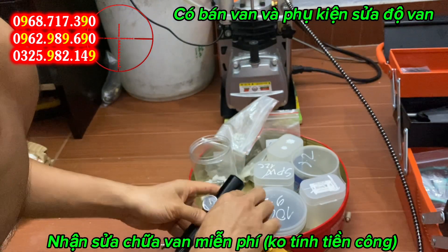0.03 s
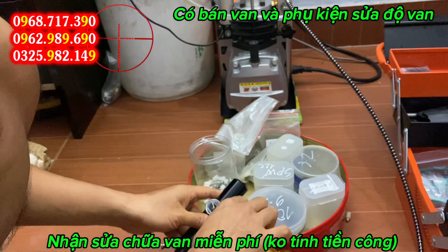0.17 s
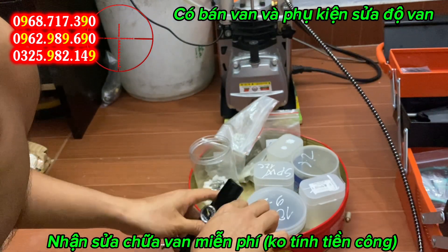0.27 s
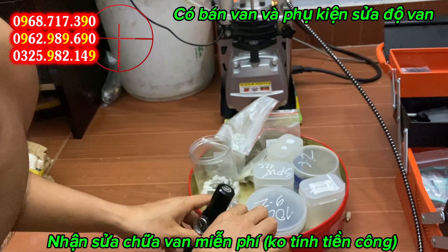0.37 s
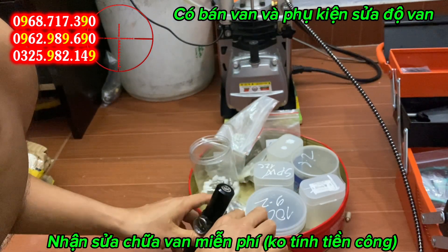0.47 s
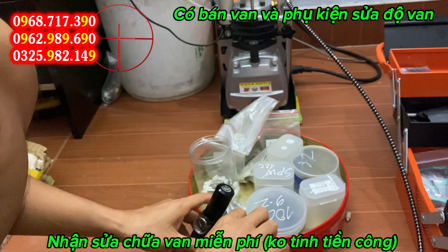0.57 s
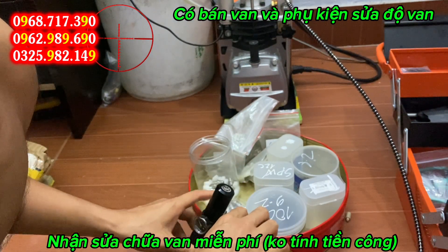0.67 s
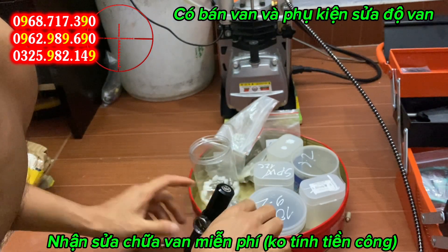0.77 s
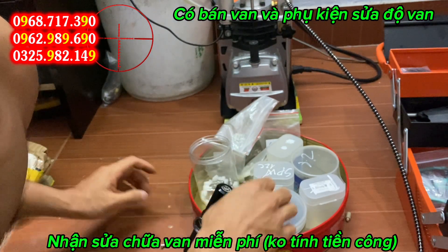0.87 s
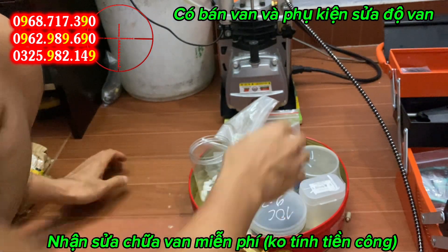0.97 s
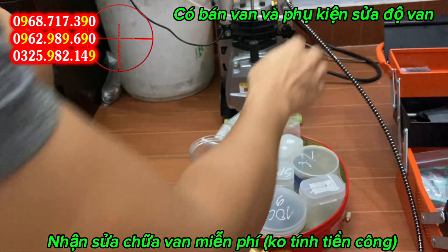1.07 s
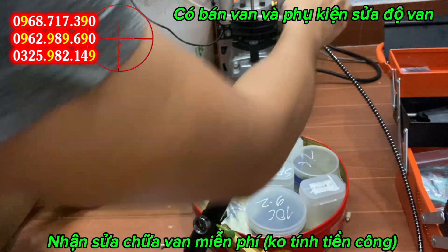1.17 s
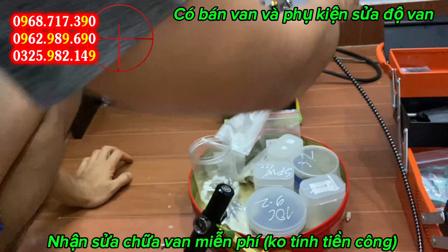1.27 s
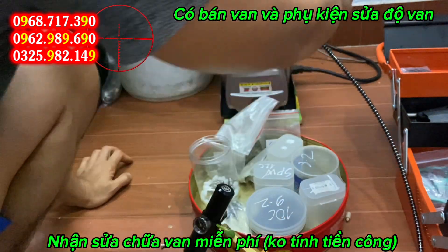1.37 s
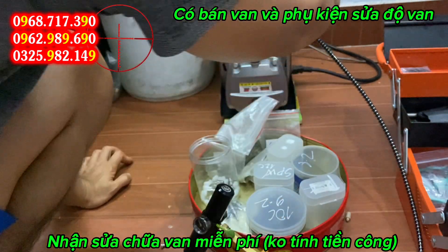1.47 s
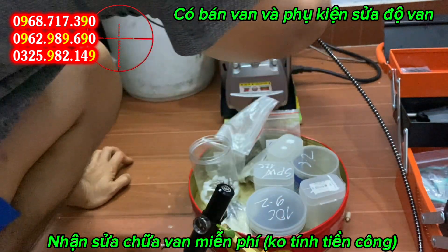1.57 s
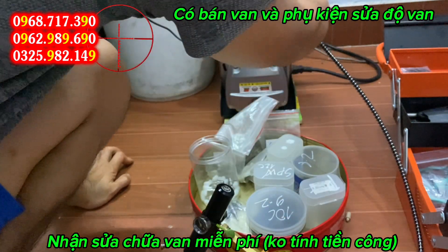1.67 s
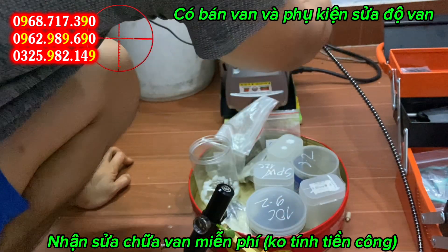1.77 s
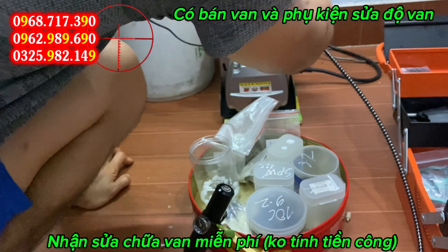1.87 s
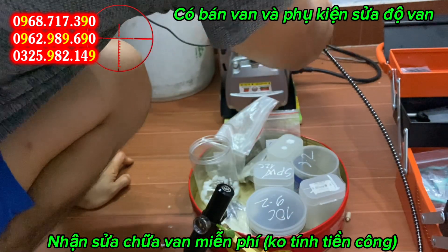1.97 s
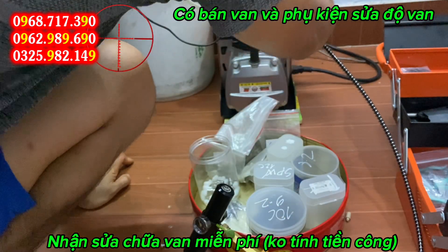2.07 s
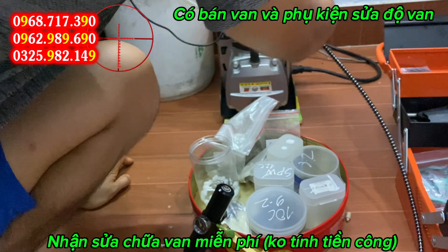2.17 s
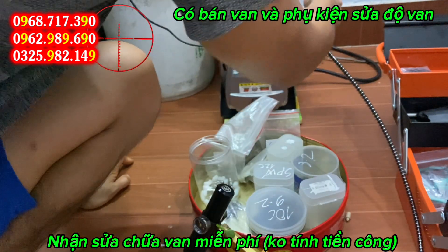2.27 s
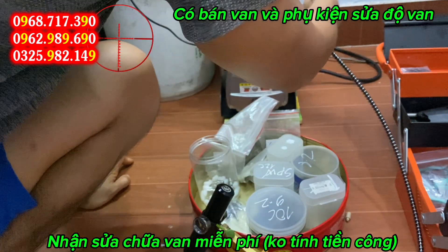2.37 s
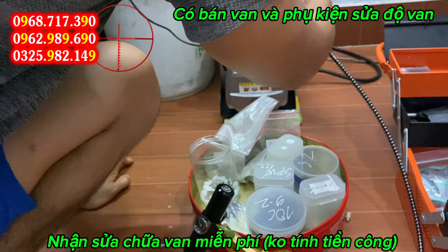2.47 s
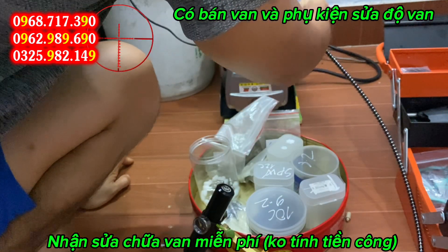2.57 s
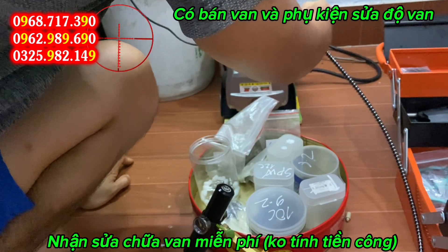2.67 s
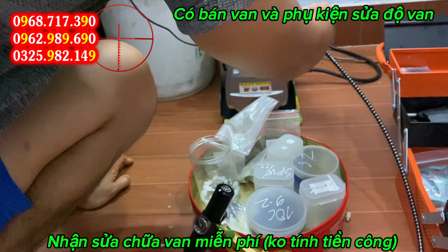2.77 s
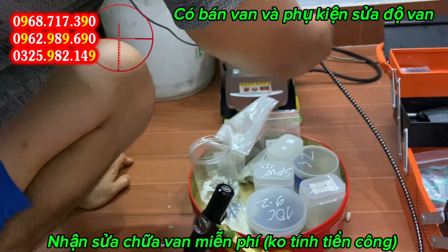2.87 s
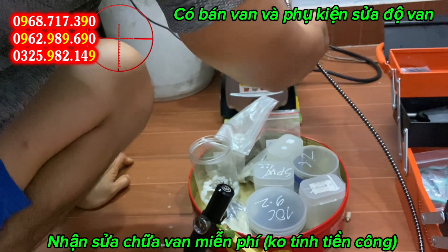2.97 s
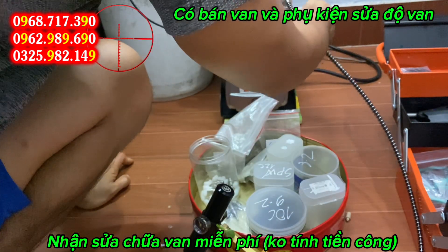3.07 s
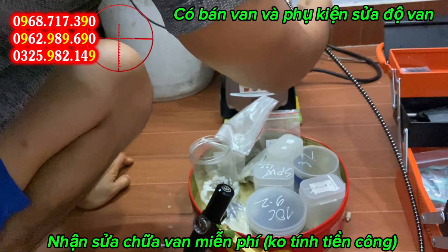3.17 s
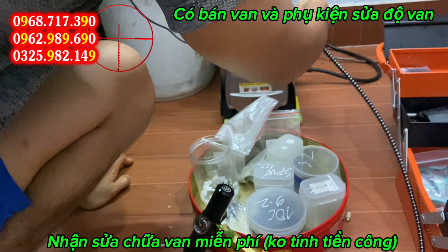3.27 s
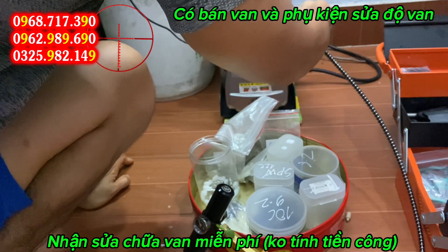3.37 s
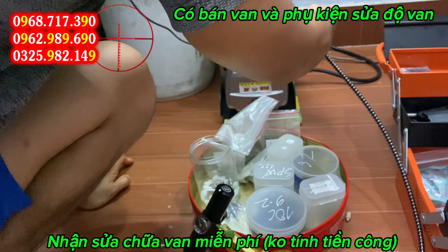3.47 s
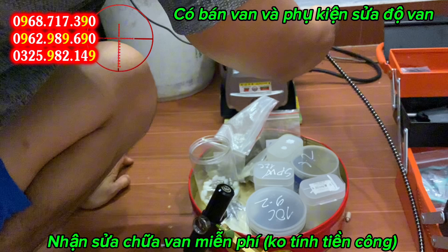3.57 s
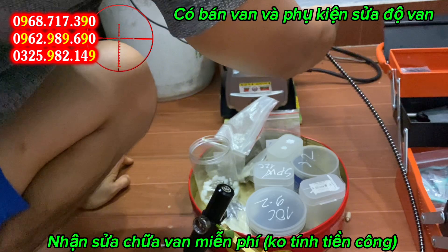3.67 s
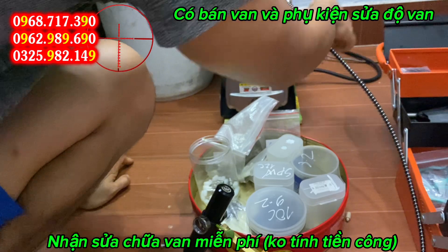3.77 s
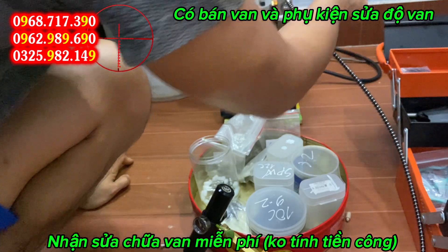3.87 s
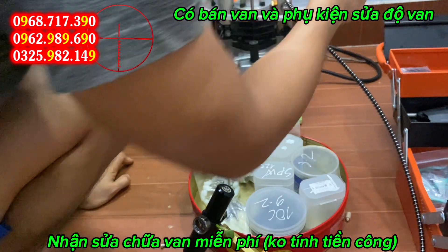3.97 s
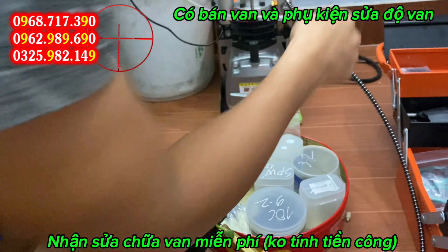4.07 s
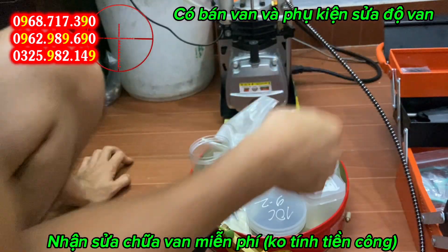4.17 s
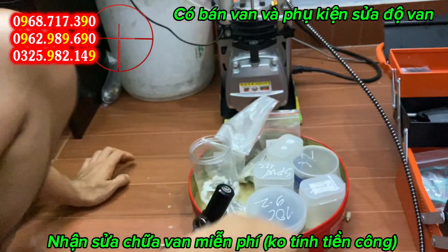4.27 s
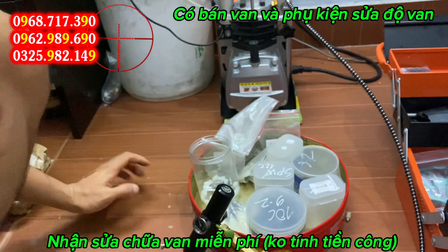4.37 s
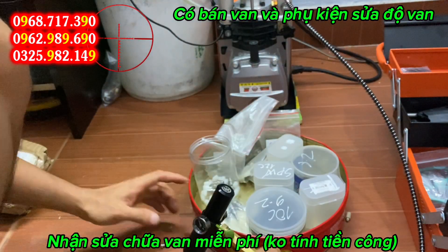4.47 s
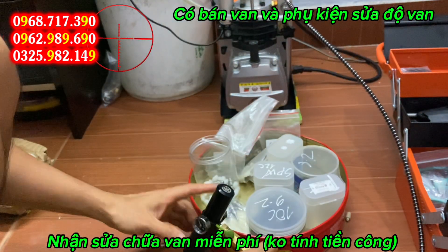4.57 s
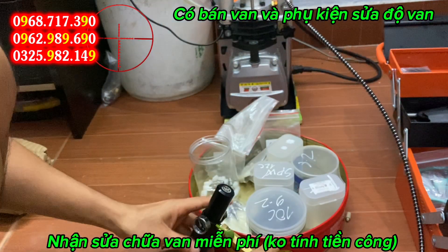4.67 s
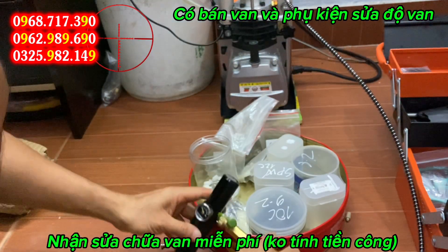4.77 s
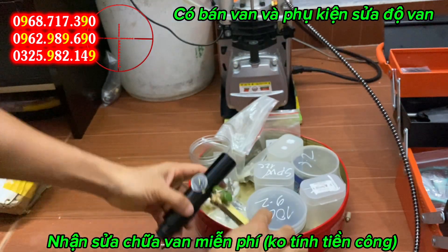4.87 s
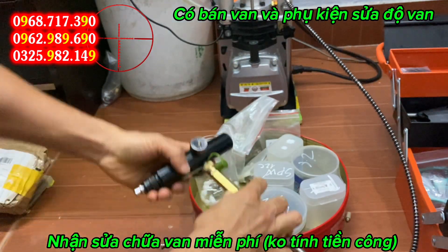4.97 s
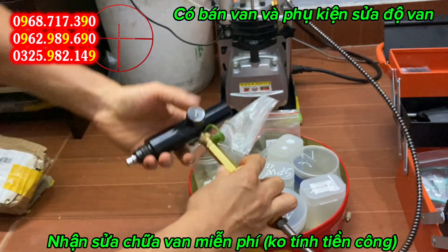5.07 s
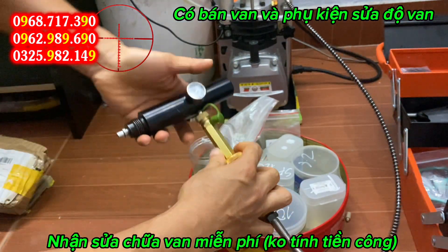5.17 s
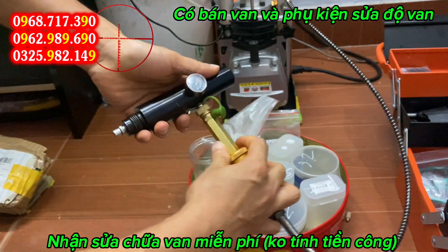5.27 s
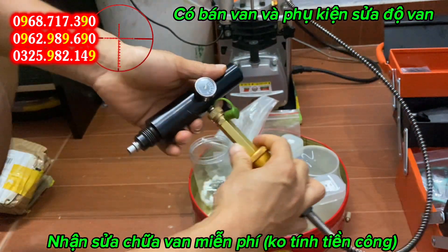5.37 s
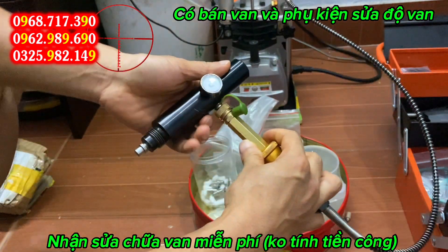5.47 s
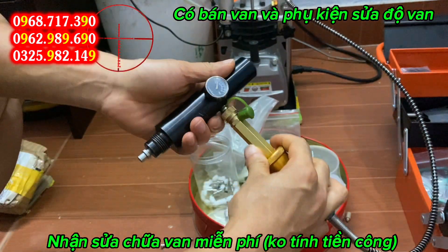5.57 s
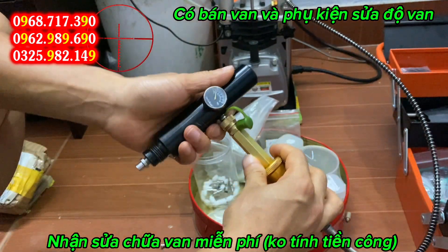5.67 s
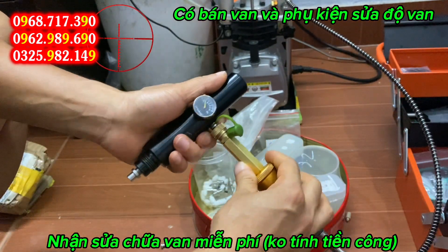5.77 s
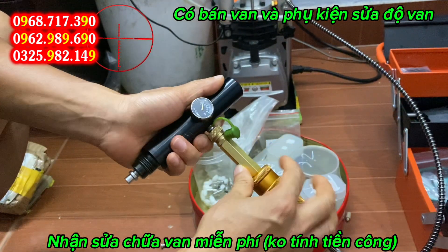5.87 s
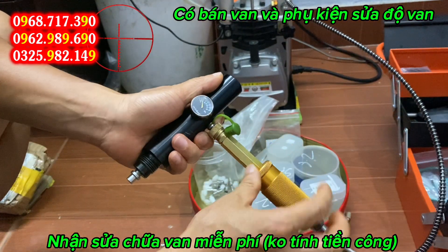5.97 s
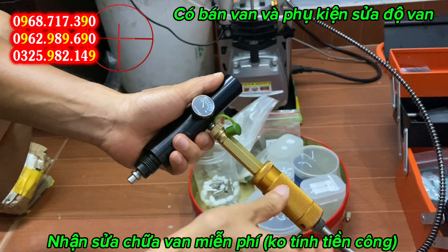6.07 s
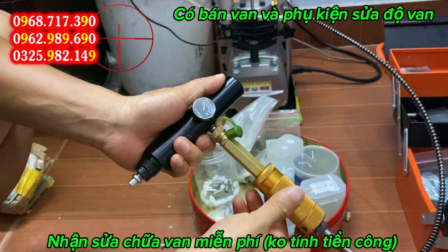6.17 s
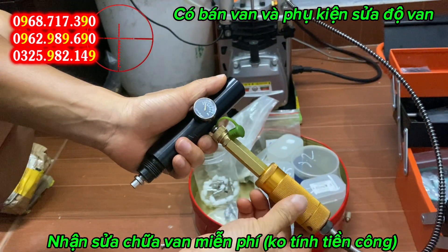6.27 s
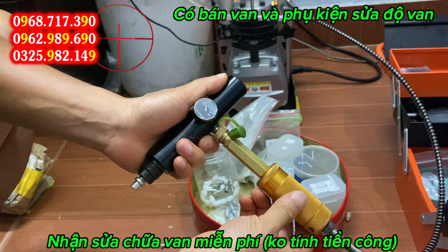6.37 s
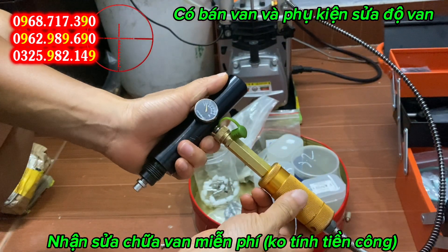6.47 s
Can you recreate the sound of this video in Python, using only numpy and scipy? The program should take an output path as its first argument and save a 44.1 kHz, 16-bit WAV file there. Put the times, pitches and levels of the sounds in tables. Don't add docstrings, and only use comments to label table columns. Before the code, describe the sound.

After light plastic and brass knocks and near silence, a small piston compressor jolts on, hisses briefly, and drones loudly in a tiled room.

```python
import sys
import numpy as np
from scipy import signal
from scipy.fft import rfft, irfft, next_fast_len
from scipy.io import wavfile
from scipy.ndimage import uniform_filter1d, map_coordinates

SR = 44100
rng = np.random.default_rng(int(sys.argv[2]) if len(sys.argv) > 2 else 0)


def makeup_ratio(level_db):
    decades = np.asarray(level_db, float) / 20
    return 10 ** decades


def digitize_waveform(pressure):
    field = np.atleast_2d(pressure).T
    bounded = np.clip(field, -1, 1)
    quanta = np.round(bounded * 32767).astype(np.int16)
    wavfile.write(sys.argv[1], SR, quanta)


N = 287532
CLOCK = np.arange(N) / SR
SWITCH_S, SHUT_S = 1.966, 2.7
FULL_SPEED_RPS = 47.4

# (time [s], level [dB])
HUM_LEVEL = [
    (2.04, -28),
    (2.14, -7.5),
    (2.23, -2),
    (2.29, 0.5),
    (2.68, 0),
    (2.87, -3),
    (3.15, 0),
    (6.52, 0),
]
# (time [s], speed [turns/s])
SHAFT_SPEED = [(1.966, 0), (2.04, 22), (2.08, 31), (2.11, 35), (2.14, 43.5), (2.17, 46.3), (2.2, 47.4),
               (2.3, 47.7), (2.6, 47.86), (2.85, 47.86), (3.1, 47.7), (3.6, 47.55), (4.3, 47.44),
               (5.3, 47.4), (6.52, 47.33)]


def unit(x):
    return x / np.sqrt(np.mean(x ** 2) + 1e-20)


def along(points, hz):
    f, v = np.transpose(points)
    return np.interp(np.log(hz + 1), np.log(f + 1), v)


def curves(rows):
    s, *cols = np.transpose(rows)
    return [np.interp(CLOCK, s, c) for c in cols]


def wobble(rate_hz):
    s = CLOCK[::128]
    knots = rng.standard_normal(200)
    return np.interp(CLOCK, s, map_coordinates(knots, [s * min(rate_hz, 25)]))


def filtered(x, response):
    m = next_fast_len(x.shape[-1] + 8192)
    spectrum = rfft(x, m) * response(np.fft.rfftfreq(m, 1 / SR))
    return irfft(spectrum, m)[..., :x.shape[-1]]


def modes(table):
    def response(f):
        total = 0
        for k, (centre, width, db) in enumerate(table):
            damped = 1j * f * width
            total = total + (-1) ** k * makeup_ratio(db) * damped / (centre * centre - f * f + damped)
        return total
    return response


def sides(db):
    return makeup_ratio(np.array([db / 2, -db / 2]))


def rush(spectrum, gate, likeness_scale=1):
    # (frequency [Hz], left-right likeness [0-1])
    likeness = [(60, 0.34), (250, 0.66), (520, 0.4), (860, 0), (1200, 0.64), (1700, 0.17), (2600, 0.48),
                (4300, 0.56), (5500, 0.16), (7000, 0.24)]

    def shape(hz):
        turn = np.arccos(np.clip(likeness_scale * along(likeness, hz), 0, 1)) / 2
        return makeup_ratio(along(spectrum, hz)) * [np.cos(turn), np.sin(turn)]

    mid, side = filtered(gate * rng.standard_normal((2, N)), shape)
    return unit(np.array([mid + side, mid - side]))


def compressor():
    stroke_s = 2.233
    turns = np.cumsum(curves(SHAFT_SPEED)[0]) / SR
    turns += 20 - turns[round(stroke_s * SR)]
    powered = slap(turns) + casing(turns) + frame(turns) + valve_and_seal(turns) + bleed_port() + groan()
    return hum(turns) + (CLOCK > SWITCH_S) * powered


def hum(turns):
    multiples = [*range(1, 15), *range(16, 21), 22, 23, 25, 26, 27, 30, 31, 33]
    # (empty level [dB], loaded level [dB], half-way time [s])
    orders = [(-19, -25.5, 3.7), (-19, -24.5, 3.35), (-33, -65, 3), (-26, -32, 2.8), (-17, -12, 1.2),
              (-20.5, -23, 2.9), (-16, -33, 2.1), (-43, -61, 5.7), (-38, -22.5, 3.1), (-44, -32.5, 4.3),
              (-35.5, -36, 3.1), (-28, -65, 4), (-41.5, -53, 4.5), (-33.5, -38, 4.5), (-38.5, -62, 5),
              (-43.5, -68, 5.2), (-48, -45, 2.8), (-49, -34.5, 3.6), (-31.5, -76, 3.94), (-36, -57, 4.44),
              (-46.5, -41.5, 5.2), (-48, -42.5, 4.8), (-41, -47, 4.7), (-45, -39.5, 4.9), (-38, -61, 5.3),
              (-38, -48, 4.2), (-39.5, -61, 4.3)]
    build_s = 0.35
    housing_rps, housing_width_rps, housing_db = 47.53, 0.09, 2
    clock, speed, slow_turns = CLOCK[::8], curves(SHAFT_SPEED)[0][::8], turns[::8]
    out = 0
    for k, (empty_db, loaded_db, half_s) in zip(multiples, orders):
        unsteady = min(0.16 * k, 1.2)
        db = empty_db + (loaded_db - empty_db) / (1 + np.exp((half_s - clock) / build_s))
        db = db + unsteady * (0.7 * wobble(2.844) + 0.3 * wobble(18))[::8]
        if k == 5:
            db += housing_db * np.exp(-((speed - housing_rps) / housing_width_rps) ** 2)
            db -= 3.8 * np.clip(46.7 - speed, 0, 14)
        if k < 5:
            lead = 1.5 * k - 2.3
        else:
            lead = 1.3 - 0.22 * k + (k > 14) * rng.normal(0, 1.5)
        apart = 0.3 * unsteady * rng.normal() * np.array([[1], [-1]])
        lead = lead + unsteady * (0.15 * wobble(9)[::8] + apart)
        out = out + makeup_ratio(db) * np.cos(2 * np.pi * k * slow_turns + lead)
    out = signal.resample_poly(out, 8, 1, axis=1)[:, :N]
    return makeup_ratio(curves(HUM_LEVEL)[0] + 3.0) * out * (CLOCK > HUM_LEVEL[0][0])


def lag():
    return np.clip(FULL_SPEED_RPS - curves(SHAFT_SPEED)[0], 0, None)


def strokes(turns, rest_db, life_turns, scatter_db):
    size = makeup_ratio(scatter_db * np.clip(rng.standard_normal(400), -2, 2))[turns.astype(int)]
    return unit(makeup_ratio(rest_db) + size * np.exp(-(turns % 1) / life_turns))


def slap(turns):
    # (frequency [Hz], width [Hz], level [dB])
    head = [(575, 110, -3), (980, 220, 0), (1220, 250, -1), (1580, 280, -4), (2650, 260, -8)]
    blow_share = 0.85
    level_db, fade_db_per_s, spinup_db_per_rps = -26.5, 5, 16
    at = np.flatnonzero(np.diff(np.floor(turns)))
    late, size, pan = rng.standard_normal((400, 3))[:len(at)].T
    blows = np.zeros((2, N + 999))
    blows[:, at + (8 * late).astype(int)] = makeup_ratio(0.8 * size) * sides(1.5 * pan)
    blows = filtered(blows[:, :N], lambda hz: 1 / (1 + (800 / (hz + 1)) ** 6))
    noise = rng.standard_normal(N) + 0.6 * rng.standard_normal((2, N))
    chatter = strokes(turns, rest_db=-14, life_turns=0.14, scatter_db=0.8) * noise
    ring = unit(filtered(blow_share * unit(blows) + unit(chatter), modes(head)))
    gain_db = level_db - fade_db_per_s * (CLOCK - 2.0) - spinup_db_per_rps * np.clip(lag() - 3, 0, None)
    return makeup_ratio(gain_db) * ring


def rattle(part, extra_db=0):
    # (loaded level [dB], extra while port open [dB], fade [dB/s],
    # loss below full speed [dB per turn/s], switch jolt [dB])
    parts = dict(casing=(-24, 3.5, 0.47, .5, -57), frame=(-32.5, 2.5, 0.02, 1, -38),
             reed=(-35.5, 3.5, 0.27, 1, -37.5), leak=(-49, 9.5, -1, 2, -49))
    shut_takes_s, jolt_t60_s = 0.06, 0.14
    loaded_db, open_db, fade_db_per_s, spinup_db_per_rps, jolt_db = parts[part]
    vented = 0.5 - 0.5 * np.tanh((CLOCK - SHUT_S) / shut_takes_s)
    steady_db = loaded_db + open_db * vented - fade_db_per_s * (CLOCK - 3.5) - spinup_db_per_rps * lag()
    jolt = makeup_ratio(jolt_db - 60 * np.abs(CLOCK - SWITCH_S) / jolt_t60_s)
    return makeup_ratio(steady_db + extra_db) + jolt


def casing(turns):
    # (frequency [Hz], density [dB/Hz])
    casing_spectrum = [(35, -40), (60, -31), (108, -32.5), (146, -64), (236, -18.5), (372, -17.5),
                       (560, -11.5), (700, -23.5), (820, -22), (1000, -17.5), (1300, -22), (2000, -22.5),
                       (3500, -56.5), (6000, -86.5)]
    gate = strokes(turns, rest_db=1.5, life_turns=0.15, scatter_db=1.5)
    return rattle('casing', 0.5 * wobble(12) - 4.1) * rush(casing_spectrum, gate)


def frame(turns):
    # (frequency [Hz], density [dB/Hz])
    frame_spectrum = [(1000, -17), (1500, -14), (1640, -18), (2150, -6.5), (3000, -9.5), (3960, -12),
                      (5750, -12.5), (6760, -19), (8300, -13.5), (9000, -15.5), (10500, -66)]
    gate = strokes(turns, rest_db=3.5, life_turns=0.16, scatter_db=4.0)
    return rattle('frame', 0.63 * wobble(18)) * rush(frame_spectrum, gate)


def valve_and_seal(turns):
    # (frequency [Hz], density [dB/Hz])
    reed_spectrum = [(4500, -45), (5800, -42), (6500, -1.5), (7300, -5.5), (8500, -6), (9800, 1.5),
                     (10500, 0.5), (11200, -9.5), (11900, -19), (12600, -4.5), (13500, -48)]
    # (frequency [Hz], density [dB/Hz])
    leak_spectrum = [(11300, -50), (12100, -22), (12600, -2), (13200, 0), (14000, -2), (15000, -4),
                     (15600, -20)]
    # (time [s], extra level [dB])
    seeps = [
        (3.14, 0),
        (3.8, 3),
        (4.399, 5),
        (6.2, 0),
    ]
    seep_life_s = 0.18
    seep_db = 0
    for s, db in seeps:
        seep_db = seep_db + db * (CLOCK > s) * np.exp(-np.abs(CLOCK - s) / seep_life_s)
    reed_gate = strokes(turns, rest_db=-12.5, life_turns=0.31, scatter_db=3.5)
    reed = rattle('reed', seep_db + 0.86 * wobble(14)) * rush(reed_spectrum, reed_gate)
    leak_gate = strokes(turns, rest_db=-2, life_turns=0.3, scatter_db=4)
    leak = rattle('leak', 1.2 * seep_db + 1.6 * wobble(22)) * rush(leak_spectrum, leak_gate)
    return reed + leak


def bleed_port():
    # (time [s], level [dB])
    bleed_level = [
        (2.1, -80),
        (2.2, -37.5),
        (2.45, -28),
        (2.6, -32.5),
        (2.7, -25),
        (2.8, -27),
        (2.92, -56.5),
    ]
    # (frequency [Hz], density [dB/Hz])
    jet_spectrum = [(3000, -15.5), (4800, -3.5), (5700, -5), (6600, -7), (8300, -7), (10000, -5),
                    (12000, -16.5), (14000, -12.5), (15500, -28)]
    # (frequency [Hz], density [dB/Hz])
    nozzle_spectrum = [(4600, -40), (5200, -6), (5800, 0), (6500, -6), (7200, -40)]
    nozzle_s, nozzle_half_s, nozzle_db = 2.71, 0.07, -31
    jet = makeup_ratio(curves(bleed_level)[0] + 1.3 * wobble(9.8)) * rush(jet_spectrum, 1, likeness_scale=0.46)
    closing = np.exp(-((CLOCK - nozzle_s) / nozzle_half_s) ** 2)
    return jet + makeup_ratio(nozzle_db) * closing * rush(nozzle_spectrum, 1)


def groan():
    # (time [s], level [dB])
    groan_level = [
        (1.97, -54),
        (2.03, -39.5),
        (2.15, -28.5),
        (2.18, -32),
        (2.21, -80),
    ]
    centre_hz, lurch_hz, lurch_db = 562.5, 36, -1
    first_lurch_s, lurch_at_s, lurch_period_s = 2.03, 2.09, 0.054
    lurch = np.cos(2 * np.pi * (np.maximum(CLOCK, first_lurch_s) - lurch_at_s) / lurch_period_s)
    strain = 2 * np.pi * np.cumsum(centre_hz + lurch_hz * lurch) / SR
    rough = 1 + 0.65 * unit(uniform_filter1d(rng.standard_normal(N), size=300))
    tones = rough * np.sin(strain) + 0.65 * np.sin(strain / 3.4) + 0.42 * np.sin(strain / 2.1)
    return makeup_ratio(curves(groan_level)[0] + lurch_db * lurch + 5.5) * tones


def knocks():
    # (time [s], peak [dB], tub ring [Hz], brass ring [dB], bright tick [dB])
    contacts = [(0.026, -31, 807, -30, -26), (0.034, -29.5, 1250, -24, -26), (0.06, -12, 1050, -27, -8.5),
                (0.067, -18.5, 1240, -11, -12), (0.104, -14.5, 790, -14.5, -14), (0.11, -20, 1300, -17, -5),
                (0.12, -15.5, 1230, -28, -23), (0.129, -28.5, 1350, -26, -22),
                (0.154, -34, 1270, -13.5, -22), (0.233, -17, 1760, -11, -36), (0.32, -20, 1130, -10, -27),
                (0.389, -24, 350, -13.5, 0.5), (0.404, -25, 880, -25, -21.5), (0.43, -23, 1100, -21, -12),
                (0.491, -33, 1080, -23, -30), (1.571, -55, 1450, -14, -6), (1.591, -41, 500, -32, -31),
                (1.609, -49, 818, -28, -27), (1.789, -61, 1770, -9, -20), (1.904, -48, 958, -15, -2),
                (1.968, -29.5, 1230, -18, -1.5), (2.064, -26, 1050, -36.5, -19),
                (2.094, -12.5, 1070, -39, -10.5), (2.125, -8, 1010, -33, -6)]
    # (frequency [Hz], density [dB/Hz])
    tub_spectrum = [(88, -52), (150, -6.5), (494, -1), (1280, 1), (2570, -6.5), (4070, -21.5), (7450, -18),
                    (8630, -17), (10200, -23.5), (12000, -28), (15600, -81), (22000, -120)]
    # (frequency [Hz], width [Hz], level [dB])
    brass_modes = [(2300, 400, -7), (3150, 200, -5), (4030, 300, 0), (6250, 700, -19)]
    # (frequency [Hz], width [Hz], level [dB])
    collar_modes = [(7330, 90, 0), (7520, 70, -1), (4900, 400, -8)]
    tub_t60_s, brass_t60_s, tick_t60_s, collar_t60_s, onset_s = 0.043, 0.047, 0.032, 0.2, 0.00086
    pan_db, pan_scatter_db = 1, 6
    out = np.zeros((2, N + SR))
    t = np.arange(SR // 8) / SR
    for s, db, hz, brass_db, bright_db in contacts:
        noise = rng.standard_normal((3, len(t)))

        def tub_response(f):
            return makeup_ratio(along(tub_spectrum, f)) * (1 + 1.2 / (1 + ((f - hz) / 220) ** 2))

        def tick_response(f):
            return (f > 4800) * makeup_ratio(along(tub_spectrum, f))

        tub = unit(filtered(noise[0], tub_response))
        brass = makeup_ratio(brass_db + 14.5 - 60 * t / brass_t60_s) * unit(filtered(noise[1], modes(brass_modes)))
        tick = makeup_ratio(bright_db - 2.0 - 60 * t / tick_t60_s) * unit(filtered(noise[2], tick_response))
        collar_gain = makeup_ratio(2 * bright_db - 12 - 60 * t / collar_t60_s)
        tick = tick + collar_gain * unit(filtered(noise[2], modes(collar_modes)))
        body = (tub + brass) * makeup_ratio(-60 * t / tub_t60_s)
        hit = makeup_ratio(db - 5.5) * (body + tick) * (1 - np.exp(-t / onset_s))
        wet = makeup_ratio(-2) * room(np.pad(hit, (150, 0)))
        at = round(s * SR)
        out[:, at:at + len(t)] += sides(rng.normal(pan_db, pan_scatter_db))[:, None] * hit
        out[:, at:at + wet.shape[1]] += wet
    return out[:, :N]


def room(x):
    # (frequency [Hz], t60 [s])
    walls = [(200, 0.4), (2000, 0.34), (10000, 0.15)]
    hz, t, z = signal.stft(rng.standard_normal((2, SR // 2)), SR, nperseg=256)
    decay = makeup_ratio(-60 * t / along(walls, hz)[:, None])
    tail = signal.istft(z * decay, SR, nperseg=256)[1]
    return signal.fftconvolve(x[None], tail / np.linalg.norm(tail[0]), axes=1)


def workshop():
    return room_tone() + faint_air() + ventilation() + far_machines()


def room_tone():
    # (frequency [Hz], density [dB/Hz])
    tone_spectrum = [(20, -29), (40, 3.5), (104, -4.5), (150, -2), (213, -5.5), (500, -9), (700, -19),
                     (930, -25.5), (1400, -25.5), (1750, -22), (2300, -32.5), (2800, -38), (5000, -37),
                     (8000, -68)]
    rest_db, run_db = -58, -39
    gain = makeup_ratio(rest_db) + makeup_ratio(run_db - 0.6 * lag())
    return gain * makeup_ratio(1.1 * wobble(5)) * rush(tone_spectrum, 1)


def faint_air():
    # (frequency [Hz], density [dB/Hz])
    air_spectrum = [(1470, -32), (2500, -8), (8290, -9), (10300, -10), (11400, -5), (12200, -24.5),
                    (13500, -14.5), (15500, -5.5)]
    # (time [s], half length [s], level [dB])
    rustles = [
        (.05, .25, -60),
        (.3, .12, -75),
        (0.833, .04, -73),
        (1.3, 0.3, -66),
    ]
    rest_db, run_db = -84, -37.5
    rustle = sum(makeup_ratio(db) * np.exp(-((CLOCK - s) / half_s) ** 2) for s, half_s, db in rustles)
    return (makeup_ratio(rest_db) + rustle + makeup_ratio(run_db - 1.6 * lag())) * rush(air_spectrum, 1)


def ventilation():
    # (frequency [Hz], density [dB/Hz])
    duct_spectrum = [(1200, -60), (1600, -12), (1720, 0), (1900, -14), (2200, -3), (2400, -16), (3000, -60)]
    return makeup_ratio(-77) * rush(duct_spectrum, 1)


def far_machines():
    # (frequency [Hz], level [dB])
    far_lines = [(47.3, -58), (49.5, -58), (75.4, -62), (94.8, -62), (99.8, -62), (145.3, -67),
                 (290.7, -74), (419.9, -80)]
    # (time [s], level [dB])
    whine_level = [
        (0.6, -76),
        (0.72, -64),
        (1.02, -65.5),
        (1.2, -80),
    ]
    in_step_s, whine_hz = 0.7, 1200
    lines = 0
    for hz, db in far_lines:
        lines = lines + makeup_ratio(db + 1.5 * wobble(2.6)) * np.sin(2 * np.pi * hz * (CLOCK - in_step_s))
    sounding = (CLOCK > whine_level[0][0]) & (CLOCK < whine_level[-1][0])
    whine = sounding * makeup_ratio(curves(whine_level)[0] + 1.5) * np.sin(2 * np.pi * whine_hz * CLOCK)
    return makeup_ratio(5) * lines + whine


def scene():
    # (frequency [Hz], left minus right [dB])
    lean = [(60, -1.5), (99, -3), (160, 1.5), (270, -2.5), (450, 1.0), (740, 0.5), (1220, -3), (2010, 2.5),
            (3330, 1.5), (5500, 1), (9080, 0), (15000, 0.0)]
    return filtered(compressor() + workshop(), lambda hz: sides(along(lean, hz))) + knocks()


def thinned(x, gate_db, spike_db):
    hz, _, z = signal.stft(x, SR, nperseg=2048)
    power = np.abs(z) ** 2
    mask = power[:, (hz > 6000) & (hz < 15000)].mean(axis=(0, 1))
    bands = uniform_filter1d(power, size=15, axis=1)
    whim_db = 2.5 * np.repeat(rng.standard_normal((2, 65, z.shape[2])), 16, axis=1)[:, :len(hz)]
    whim_db = whim_db + 3 * (hz > 11200)[:, None]
    keep = (bands > mask * makeup_ratio(gate_db + whim_db) ** 2) & (power > mask * makeup_ratio(spike_db) ** 2)
    return signal.istft(z * (keep | (hz < 2000)[:, None]), SR, nperseg=2048)[1][:, :N]


def band_limit(x):
    return signal.sosfilt(signal.butter(12, 15730, fs=SR, output="sos"), x)


def record(dry):
    left_lead_s = 1 / 44100

    def lead(hz):
        return np.exp(1j * np.pi * np.minimum(hz, 3000) * left_lead_s * np.array([[1], [-1]]))

    def spacing(hz):
        comb = np.clip((hz - 3200) / 6000, 0, 1) * np.cos(2 * np.pi * (hz - 10150) / 3650)
        rumble_cut = 1 / (1 + (38 / (hz + 1)) ** 8)
        return rumble_cut * np.sqrt(np.abs([1 + comb, 1 - comb]))

    left, right = filtered(dry, lead)
    pair = filtered(np.array([left + right, left - right]) / 2, spacing)
    mid, side = thinned(pair, gate_db=-7, spike_db=-6.5)
    mix = np.array([mid + side, mid - side])
    mix = mix / (1 + np.abs(mix / 1.02) ** 6) ** (1 / 6)
    return band_limit(mix)


dry = scene()
out = record(dry)
digitize_waveform(out)
```